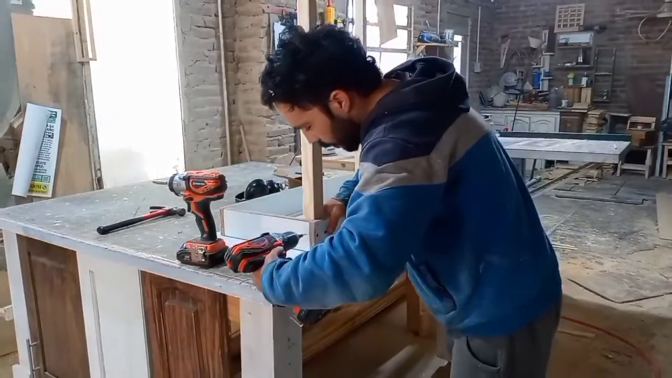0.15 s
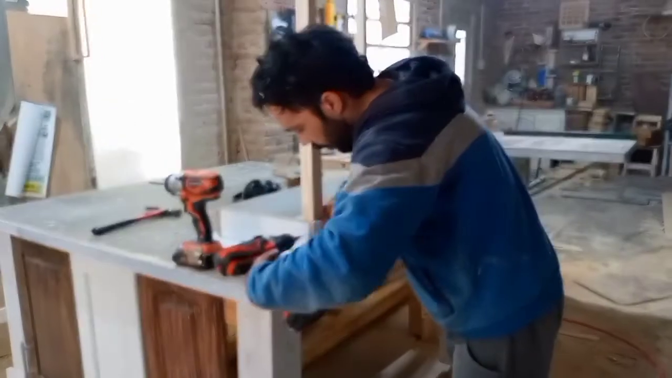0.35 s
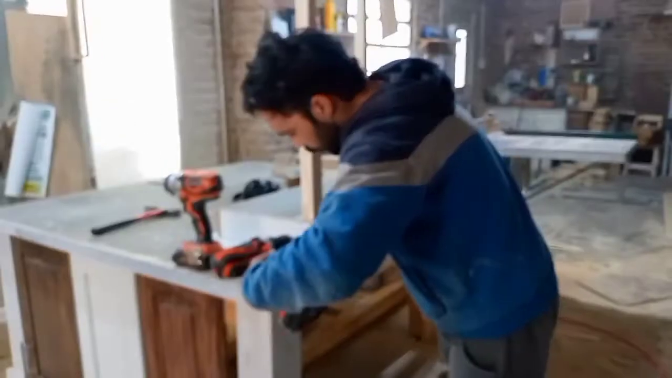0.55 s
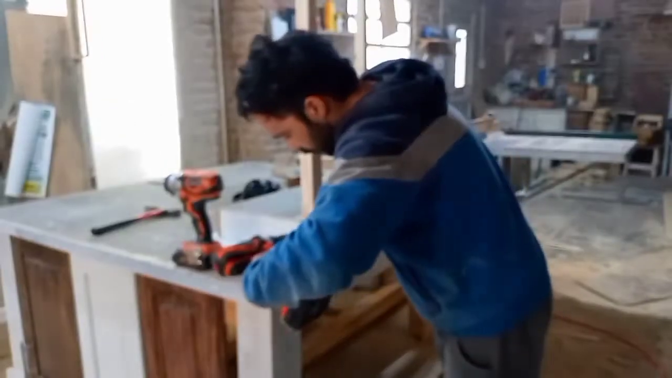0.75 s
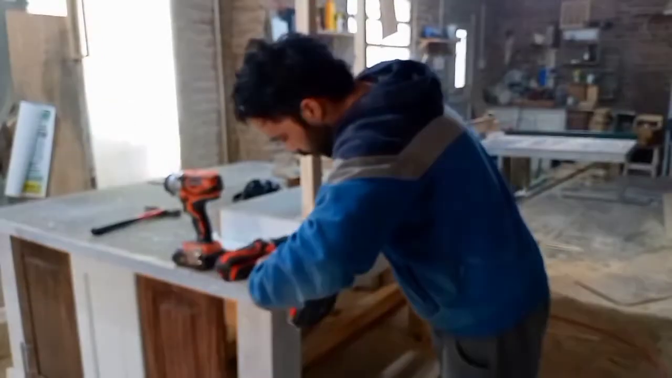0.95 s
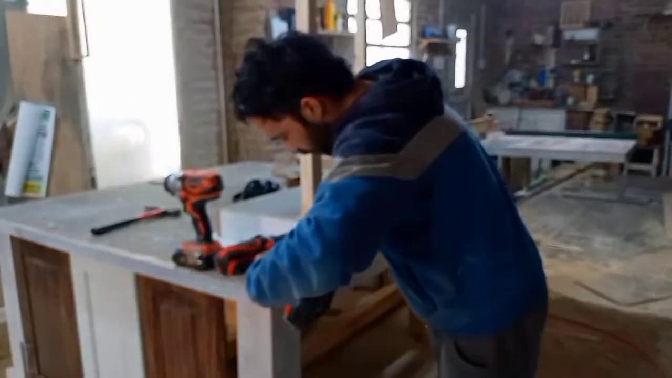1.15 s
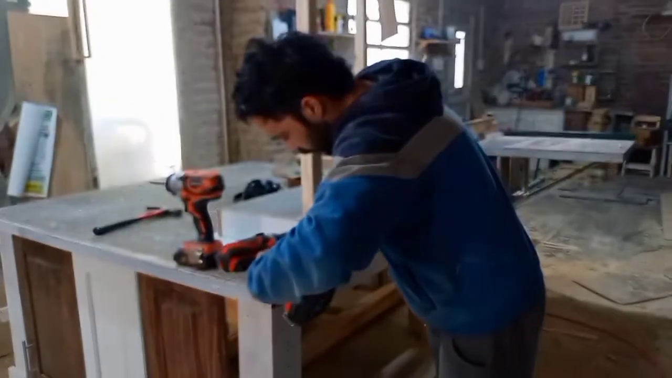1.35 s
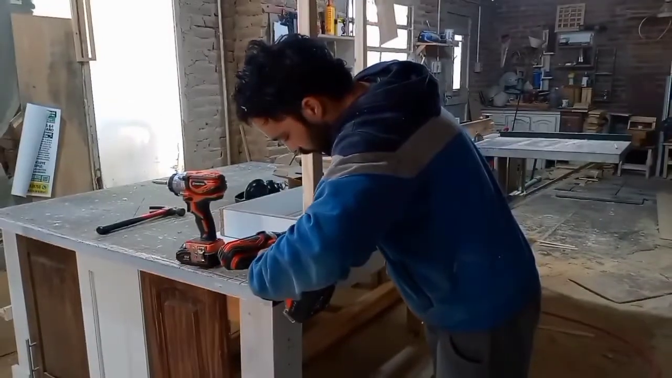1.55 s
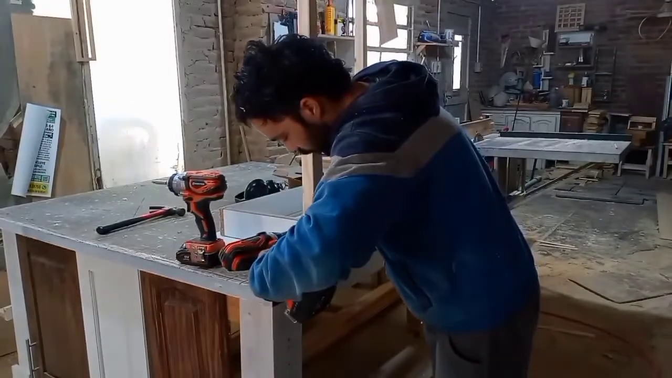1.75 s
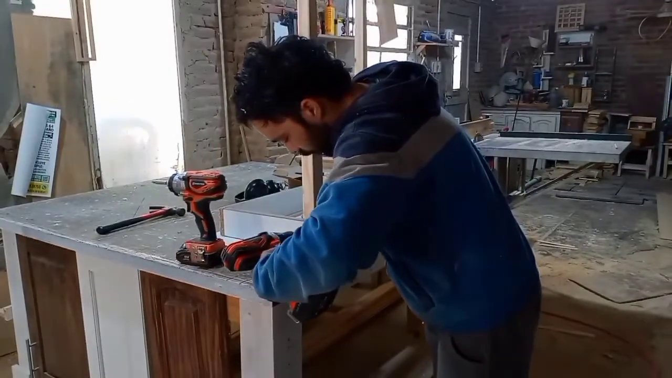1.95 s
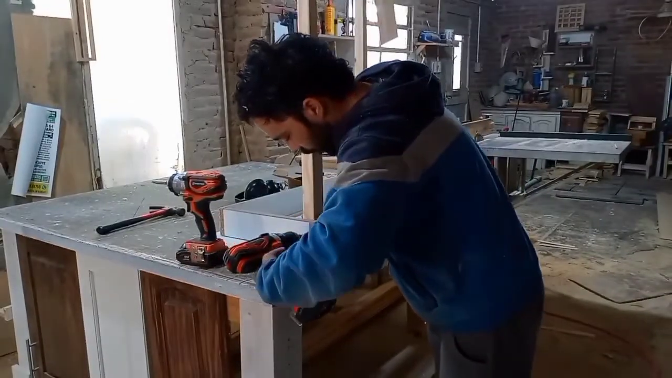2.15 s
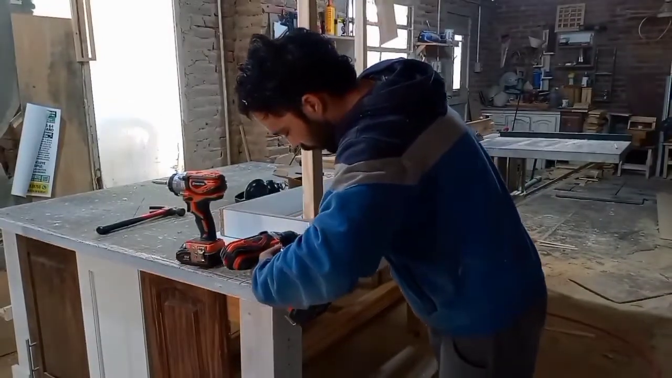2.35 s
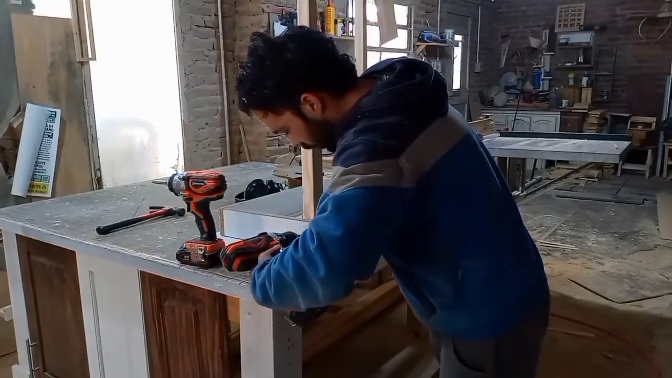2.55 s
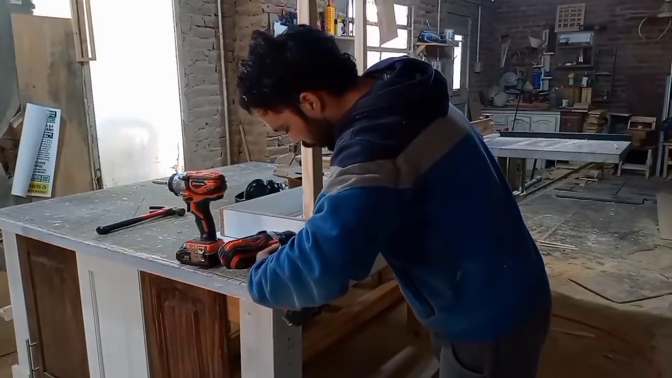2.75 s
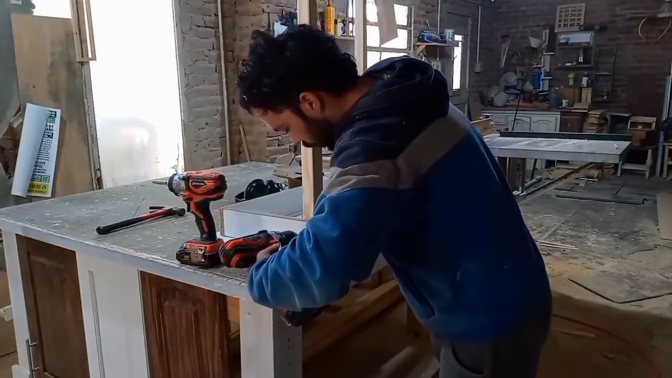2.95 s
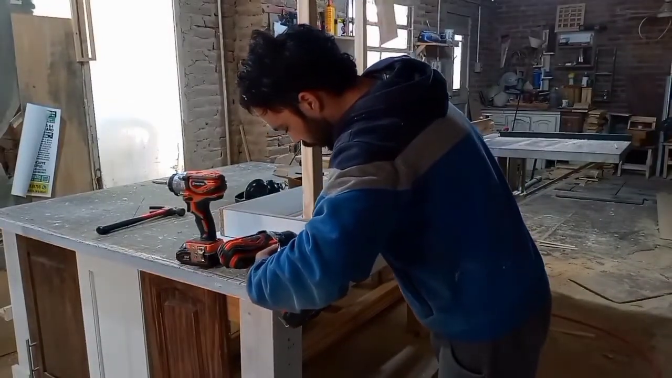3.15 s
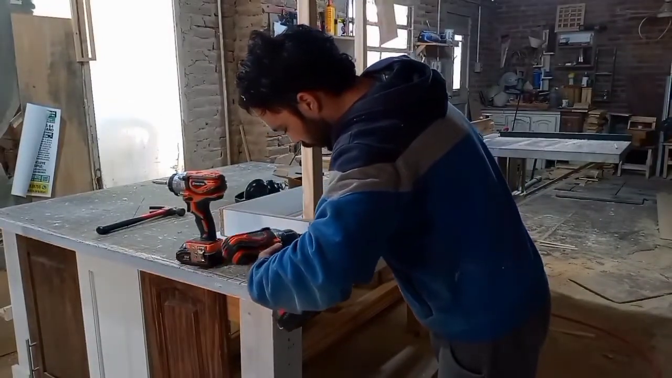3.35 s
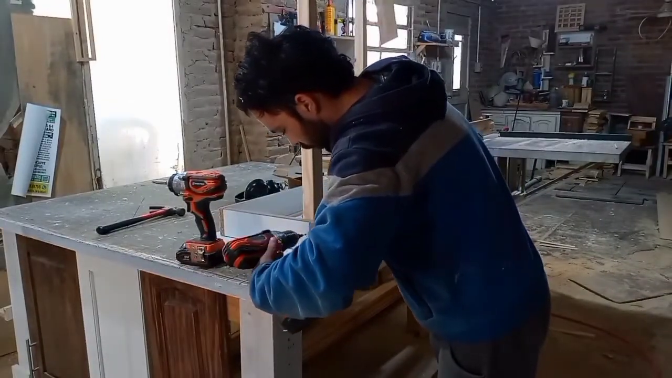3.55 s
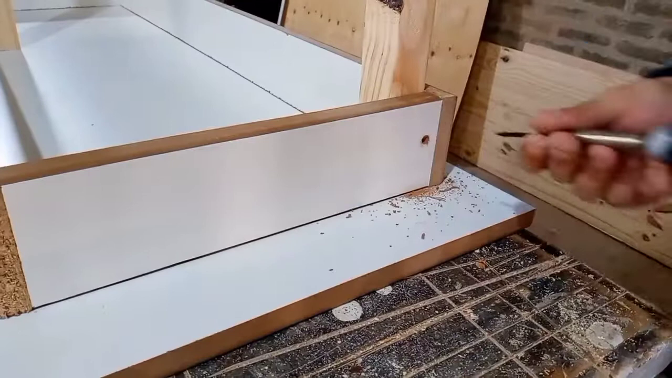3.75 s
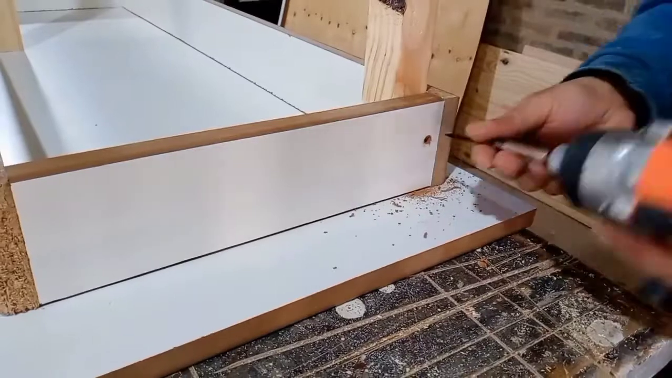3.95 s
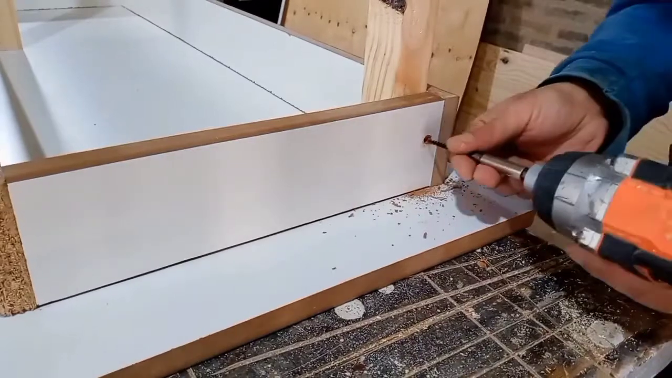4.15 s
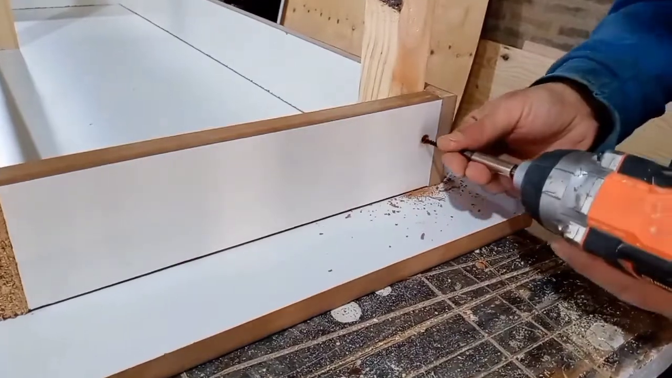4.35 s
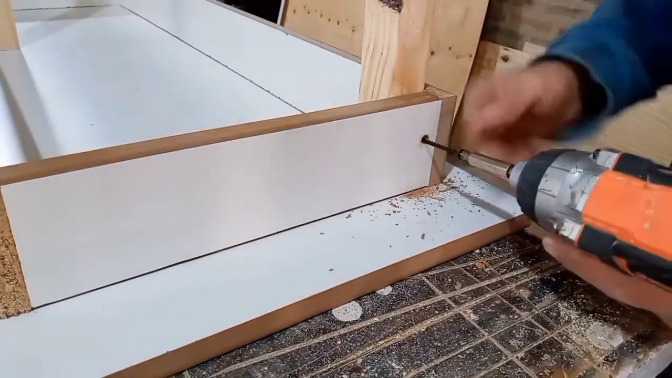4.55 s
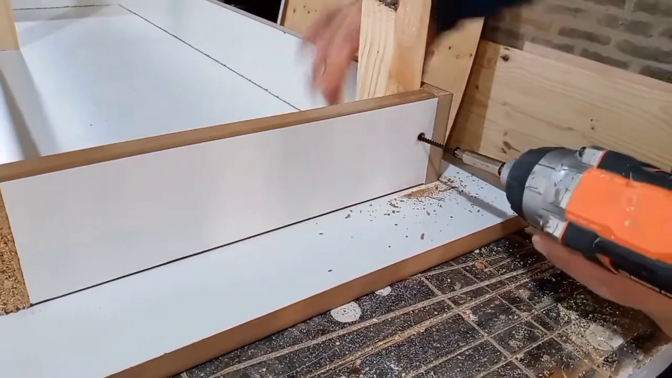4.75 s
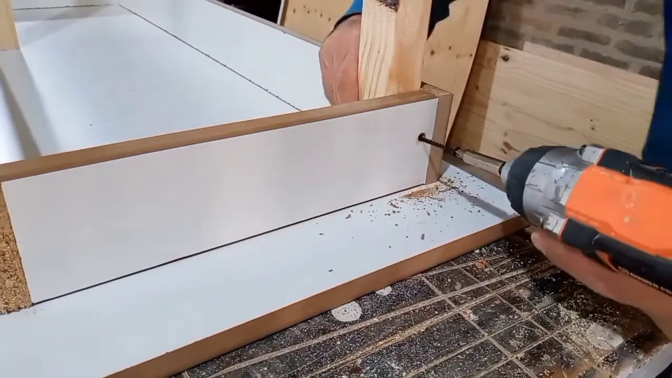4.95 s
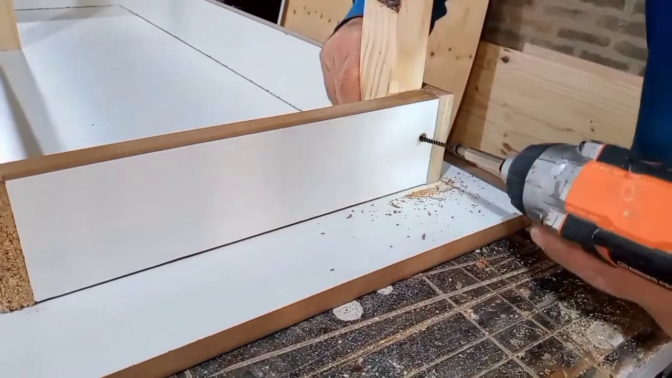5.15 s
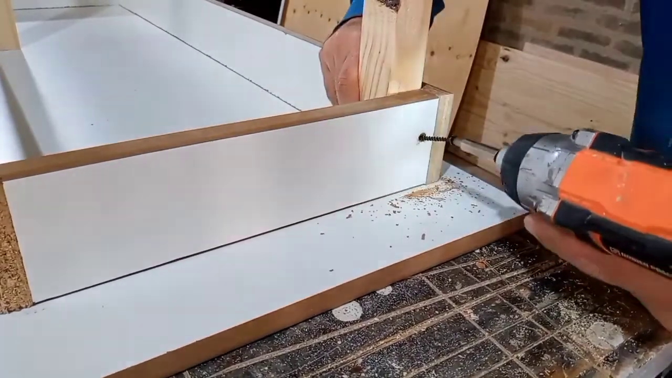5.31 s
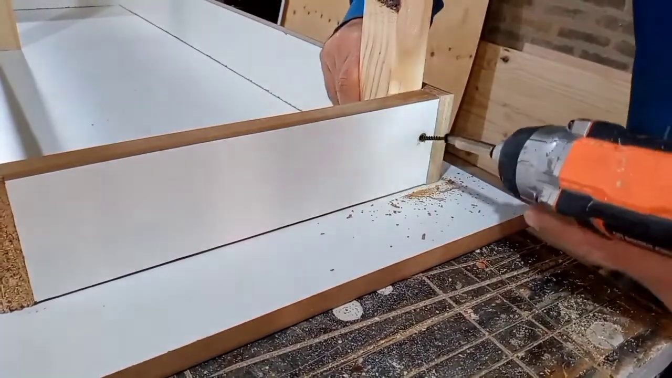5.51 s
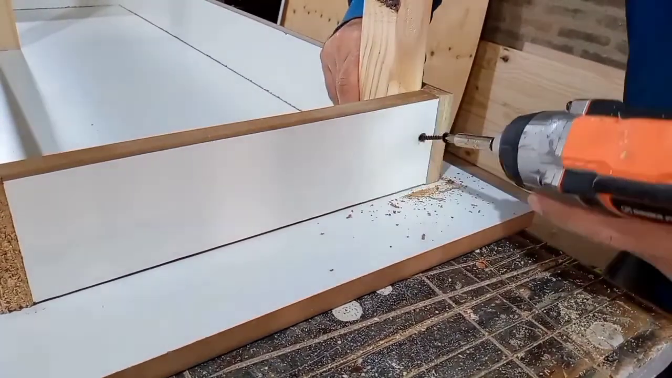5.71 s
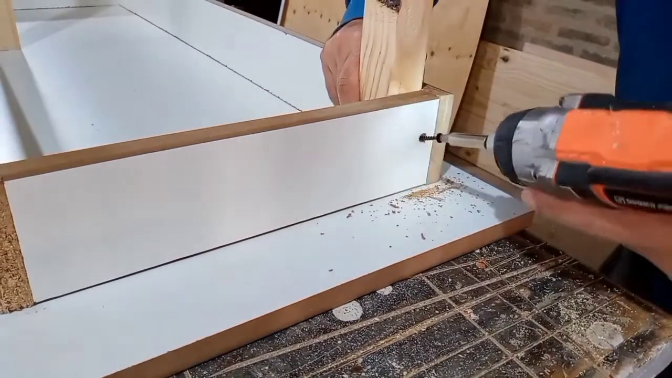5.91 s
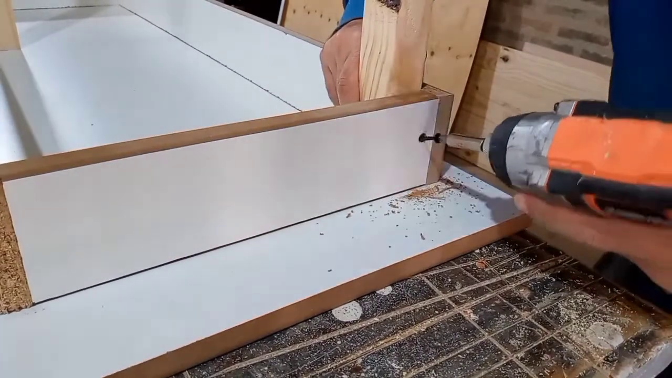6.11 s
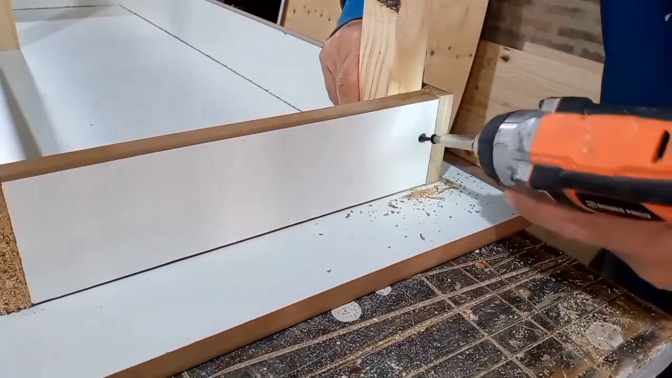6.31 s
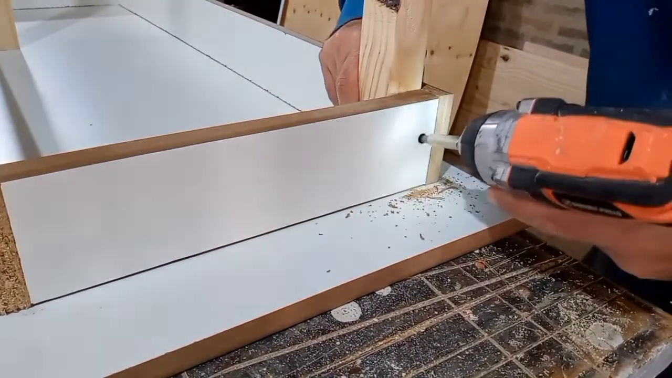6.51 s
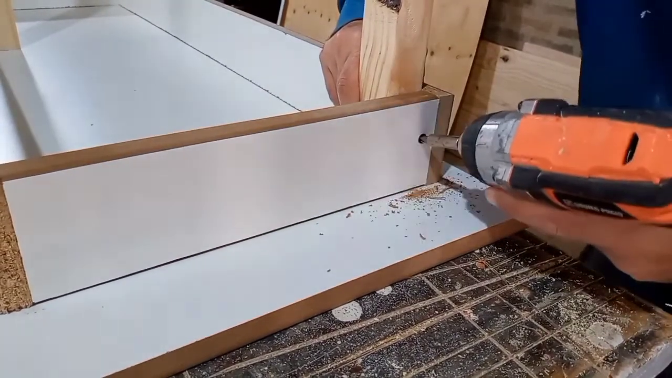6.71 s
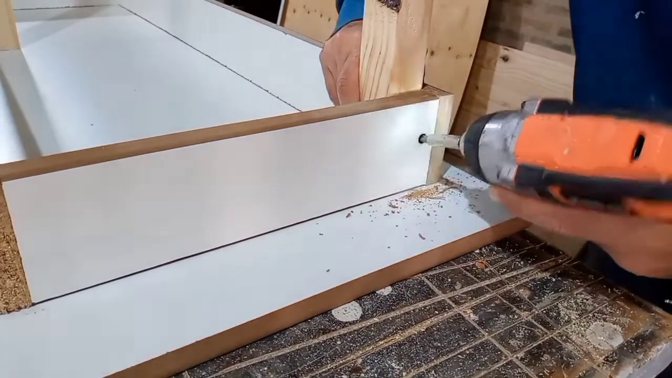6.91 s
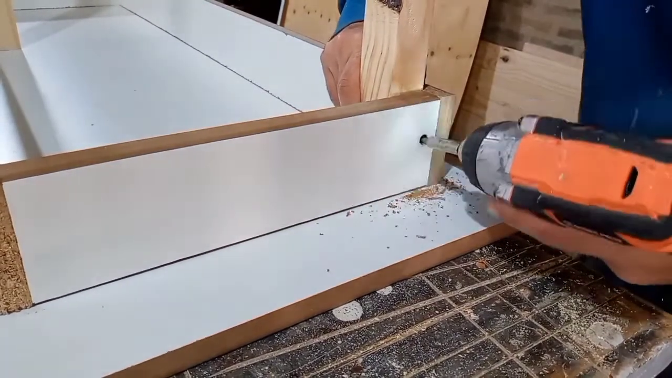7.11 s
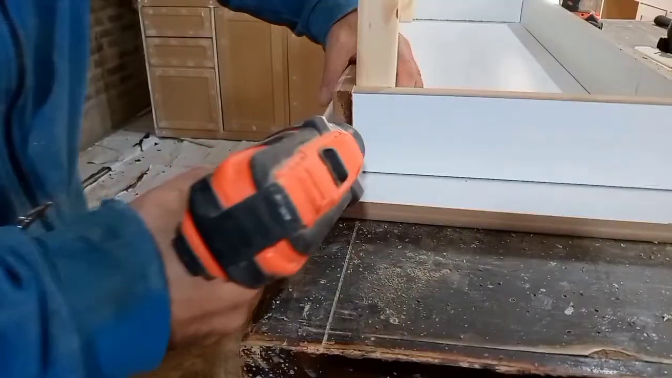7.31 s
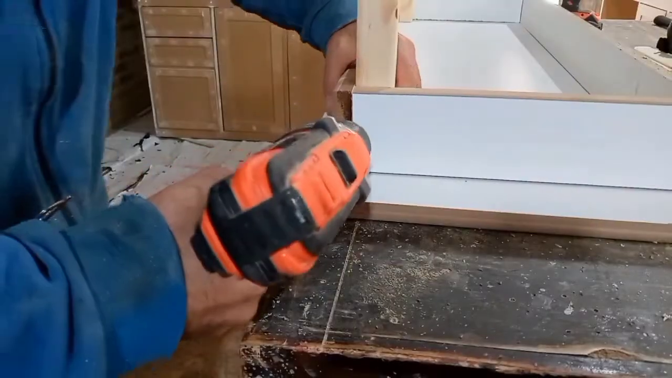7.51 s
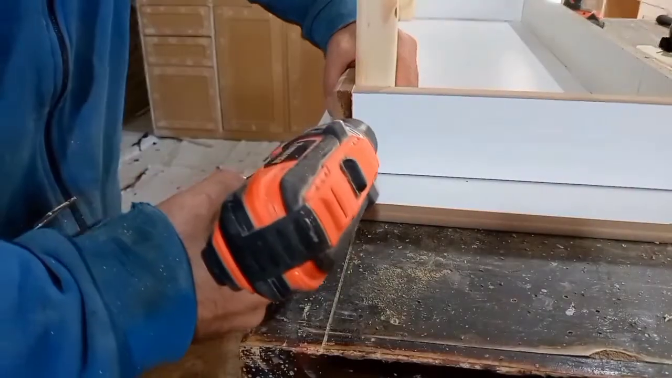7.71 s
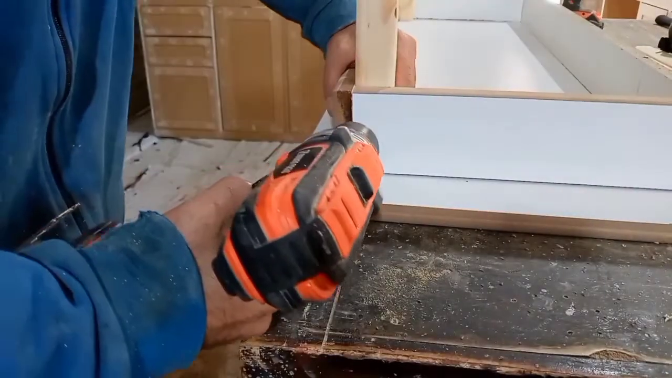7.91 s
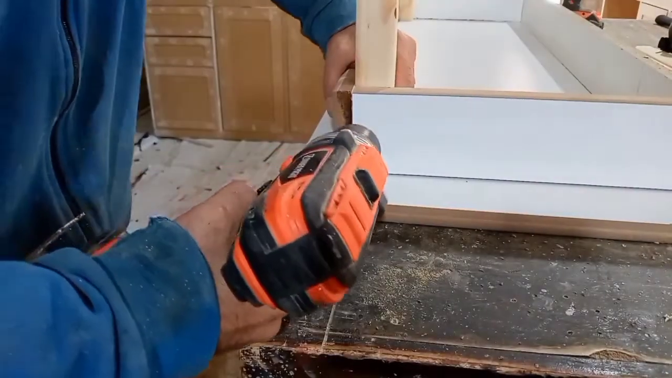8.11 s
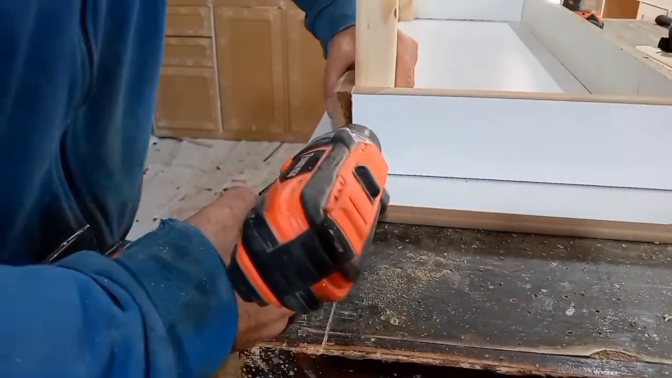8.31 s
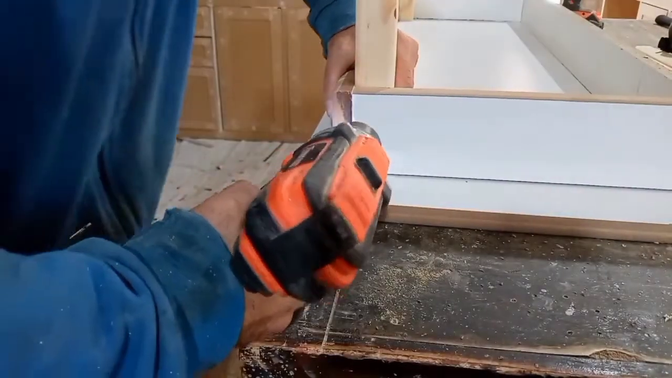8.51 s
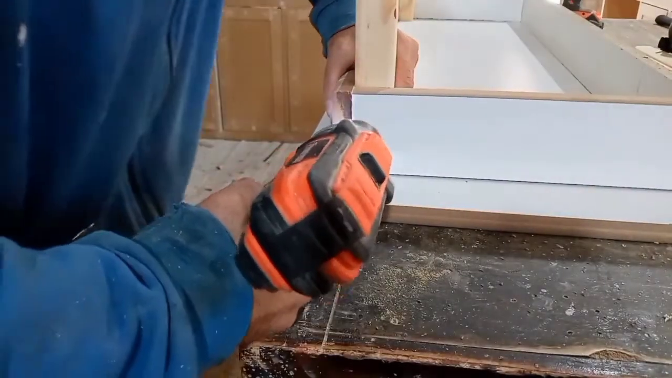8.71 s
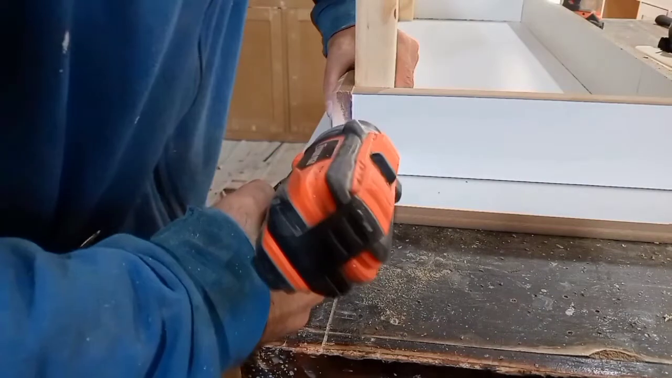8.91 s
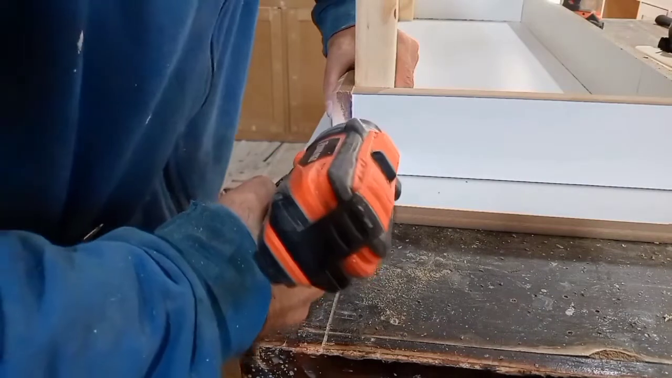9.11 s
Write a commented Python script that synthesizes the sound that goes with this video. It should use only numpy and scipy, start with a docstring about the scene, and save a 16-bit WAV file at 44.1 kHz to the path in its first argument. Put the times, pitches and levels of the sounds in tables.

```python
"""Drilling and driving a screw in a workshop

A cordless drill bores into a board in long runs and a driver turns a screw in with short bursts.
Gear teeth whine over a rough hiss that throbs once per motor turn, the board drums along and a
slipping bit squeals. Triggers click, tools knock on the bench and sleeves rustle in the pauses.
Both channels carry the same sound."""
import sys
import numpy as np
from scipy import signal
from scipy.fft import rfft, irfft, next_fast_len
from scipy.io import wavfile
from scipy.ndimage import uniform_filter1d

SR = 44100
rng = np.random.default_rng(int(sys.argv[2]) if len(sys.argv) > 2 else 0)


def wav_out(sig):
    """Save sig, one row per channel (or a flat mono array), as 16-bit PCM at SR to the path in sys.argv[1]."""
    wavfile.write(sys.argv[1], SR, np.round(np.clip(np.atleast_2d(sig).T, -1, 1) * 32767).astype(np.int16))


N = 408366
TOP_HZ = 15750


def undb(db):
    return 10 ** (np.asarray(db) / 20)


def walk(rate_hz, size):
    """Random levels held 1 / rate_hz s and slewed; spread near 1."""
    hold = int(SR / rate_hz)
    steps = np.repeat(rng.standard_normal(size // hold + 1), hold)
    return 1.2 * uniform_filter1d(steps, hold)[:size]


def colour(x, points, lo_hz=20., hi_hz=19900.):
    """Equalises x by (frequency [Hz], level [dB]) points between two soft edges; rms 1."""
    size = next_fast_len(len(x))
    hz = np.arange(1, size // 2 + 2) * SR / size
    point_hz, db = np.transpose(points)
    curve = undb(np.interp(np.log(hz), np.log(point_hz), db))
    edges = 1 / np.sqrt((1 + (lo_hz / hz) ** 8) * (1 + (hz / hi_hz) ** 8))
    shaped = irfft(rfft(x, size) * curve * edges, size)[:len(x)]
    return shaped / np.sqrt(np.mean(shaped ** 2))


def automation(rows):
    """First sample and per-sample curves of a breakpoint table."""
    times, *columns = np.transpose(rows)
    i = np.arange(int(times[0] * SR), min(int(times[-1] * SR), N))
    return i[0], [np.interp(i / SR, times, column) for column in columns]


def add(out, start, x):
    out[start:start + len(x)] += x[:len(out) - start]


# Room tone EQ: (frequency [Hz], relative level [dB])
ROOM_TONE_EQ = [(18, -51), (30, -28.5), (177, -18.5), (208, -9), (237, -16), (518, -16.5), (591, -20),
                (7800, -30.5), (9000, -38.5), (11500, -37.5), (13000, -31.5), (15500, -30)]


def room_tone(level_db=-76.5):
    """The workshop's faint, steady bed of low noise."""
    return undb(level_db) * colour(rng.standard_normal(N), ROOM_TONE_EQ)


def reflections(x, t60_s=.13, wet_db=-11):
    """The walls return a short, dark tail."""
    t = np.arange(SR // 2) / SR
    tail = colour(rng.standard_normal(len(t)), [(150, -5), (1000, 1.5), (6000, -5), (15000, -12.5)])
    tail *= 1000 ** (-t / t60_s)
    tail *= np.clip(t / .002, 0, 1) / np.sqrt(np.sum(tail ** 2))
    return undb(wet_db) * signal.fftconvolve(x, tail)[:N]


# Bench resonances, for rustle and strike: (frequency [Hz], relative level [dB], T60 [s])
WOOD_MODES = [(129, -12, 0.33), (372, 2, 0.2), (560, -9.5, 0.24), (749.4, -1, 0.28), (1050, -10.5, 0.19),
              (1580, -14, 0.83), (2220, -9, 0.14), (2299, -8.5, 0.13)]
# Hands, sleeves and sliding tools, one list per move: (time [s], hiss [dB], rumble [dB])
RUSTLE_MOVES = [
    [(0.1, -87, -86), (0.22, -68, -68), (0.34, -95, -95)],
    [(3.5, -31, -68), (3.54, -54, -52), (3.64, -51.5, -60), (3.694, -54, -45.5), (3.725, -59, -55),
     (3.74, -45.5, -59), (3.89, -53.5, -75), (3.96, -66, -87), (4.05, -83, -87)],
    [(4.05, -77, -89), (4.42, -70, -72), (4.48, -62, -65), (4.6, -59, -66.5), (4.69, -74.5, -80),
     (4.725, -63, -79.5), (4.8, -73, -82), (4.99, -84, -88)],
    [(7.09, -60, -54), (7.136, -54.5, -50.5), (7.334, -68, -68.5), (7.476, -80, -87), (7.556, -81, -67),
     (7.8, -90, -100)],
    [(7.95, -85, -77.5), (8.22, -76, -71), (8.245, -62, -75), (8.29, -63, -80)],
]


def rustle():
    """Cloth and tools drag over the bench: grainy hiss, and a rumble in the modes of the wood."""
    out = np.zeros(N)
    cloth_eq = [(1500, 1.5), (4000, 2), (7800, 2.5), (9500, -6.5), (15000, -6)]
    wood_eq = sorted((hz * ratio, db / 2 + skirt_db) for hz, db, _ in WOOD_MODES
                     for ratio, skirt_db in ((.92, -7), (1, 0), (1.08, -7)))
    for move in RUSTLE_MOVES:
        start, (hiss_db, rumble_db) = automation(move)
        grains = undb(1.6 * walk(260, len(hiss_db))) * rng.standard_normal((2, len(hiss_db)))
        hiss = colour(grains[0], cloth_eq, 1500)
        rumble = colour(grains[1], wood_eq, 270, 2200)
        add(out, start, undb(hiss_db) * hiss + undb(rumble_db) * rumble)
    return out


def strike(out, time_s, level_db, ring_hz, thud_hz, thud_db, t60_s):
    """Adds one hit: a soft swell, a wide crack, the tool's ring and a thud in the wood."""
    t = np.arange(SR // 4) / SR
    fade = lambda t60: 1000 ** (-t / t60)
    crack_noise, ring_noise, scatter, thump_noise, swell_noise = rng.standard_normal((5, len(t)))
    # hard blows crack brighter, light taps ring more
    crack = colour(crack_noise, DRIVER_EQ, 640, 40000 * undb(.27 * level_db))
    crack *= .57 * fade(.016) + .17 * fade(t60_s)
    ring = colour(ring_noise, [(ring_hz / 1.2, -25), (ring_hz, 0), (ring_hz * 1.2, -25)])
    ring *= undb(-18.5 - .2785 * level_db) * fade(t60_s)
    modes = np.zeros(len(t))
    for (hz, db, mode_t60), gain, detune in zip([*WOOD_MODES, (thud_hz, -2, .08)], scatter, scatter[50:]):
        mode_db = db + 4 * gain - 9 * abs(np.log2(hz / thud_hz))  # favours the struck spot's pitch
        tone = np.sin(2 * np.pi * hz * (1 + .04 * detune) * t)
        modes += undb(mode_db) * tone * fade(min(mode_t60, 2.2 * t60_s))
    thump_eq = [(thud_hz / 10, -50), (thud_hz / 2.5, -20), (thud_hz, 0), (thud_hz * 2.5, -12)]
    thump = .6 * colour(thump_noise, thump_eq) * fade(t60_s)
    thud = undb(thud_db + 3) * (modes / np.abs(modes).max() + thump)
    attack = 1 - np.exp(-t / .0008)
    start, lead = int(time_s * SR), int(.03 * SR)
    add(out, start, undb(level_db) * (crack + ring + thud) * attack)
    swell = colour(swell_noise[:lead], DRIVER_EQ, 800) * fade(.051)[lead - 1::-1]
    add(out, start - lead, undb(level_db - 21) * swell)


# Trigger pulls: (time [s], click [dB], jolt lag [s], jolt [dB], ring [Hz])
TRIGGER_PULLS = [(4.913, -51, 0.02, -34, 2650), (5.598, -38, 0.024, -18, 4500),
                 (6.081, -23, 0.026, -10, 2190), (6.727, -21.5, .026, -2, 7190),
                 (8.296, -25.5, 0.023, -22, 4830)]


def triggers():
    """The switch clicks, then the gears jolt."""
    out = np.zeros(N)
    for time_s, click_db, _, _, ring_hz in TRIGGER_PULLS:
        strike(out, time_s, click_db, ring_hz, thud_hz=1100, thud_db=-15, t60_s=.035)
    for time_s, _, lag_s, jolt_db, ring_hz in TRIGGER_PULLS:
        strike(out, time_s + lag_s, jolt_db, ring_hz, thud_hz=1560, thud_db=-16, t60_s=.035)
    return out


# Hits, mostly knocks of tools and a few trigger clicks: (time [s], level [dB], ring [Hz], thud [Hz], relative
# thud level [dB])
HITS = [(0.07, -69, 2970, 452, 4), (0.178, -54, 3130, 710, -3), (0.367, -29.5, 4000, 690, -35),
        (1.588, -11, 3170, 1585, -11.5), (1.629, -11, 3450, 746, -12), (2.123, -46, 5520, 1670, -11),
        (3.217, -16, 8300, 678, -14.5), (3.472, -12.5, 6350, 900, -35),
        (3.478, -16, 3580, 1820, -16.5), (3.733, -47.5, 5000, 685, 0), (3.878, -44, 7200, 458, -31),
        (4.13, -64, 7500, 900, -13), (4.229, -48, 5400, 824, -6), (4.378, -53, 7800, 1560, -4),
        (4.438, -48, 2150, 1430, 3), (5.004, -20, 4720, 1100, -11), (5.636, -17.5, 6000, 1586, -11),
        (5.753, -8.5, 7000, 1830, -18.5), (5.817, -5, 7800, 1000, -19), (5.837, -21, 7280, 1617, -12),
        (5.861, -14, 2860, 393, -11), (6.062, -43.5, 3500, 1000, -30), (6.454, -5, 3040, 754, -18.5),
        (6.479, -5, 2093, 940, -15.5), (6.709, -34, 7180, 966, -13.5), (6.777, -12, 7590, 1590, -14.5),
        (7.382, -40.5, 1994, 750, -5), (7.41, -55.5, 7600, 810, 0), (7.542, -58, 2300, 320, 1.5),
        (7.6, -78.5, 2300, 140, 12), (7.62, -80, 2300, 140, 13), (8.015, -57.5, 4540, 1050, -3),
        (8.105, -34, 7500, 660, -3.5), (8.235, -36.5, 7290, 1160, -15.5)]


def knocks():
    """Tool, bit and bench knock together; a few of the hits are trigger clicks."""
    out = np.zeros(N)
    for hit in HITS:
        strike(out, *hit, t60_s=.068)
    return out


# Slips of the bit: (time [s], first pitch [Hz], settled pitch [Hz], level [dB], overtone trim [dB],
# hold [s], sag during the hold [dB/s], fall after it [dB/s])
BIT_SLIPS = [(3.165, 8100, 8180, -24, 0, 0.042, 148, 298),
             (5.215, 6500, 6300, -28.5, -16.5, .005, 98.5, 602),
             (5.26, 5600, 4620, -21, -4, .036, 20, 3000), (5.312, 3814, 2954, -21.5, 5, 0.074, 82, 171.5)]
# Squeal harmonics, fundamental first: (relative level [dB])
SQUEAL_HARMONICS = [0.5, 0, -5, -10, -10]


def squeal(glide_s=.012, rise_db_per_s=800):
    """Steel sticks and slips on steel: a rough, fluttering stack that glides onto its pitch."""
    out, t = np.zeros(N), np.arange(-SR // 30, SR // 3) / SR
    sliding = np.exp(-np.maximum(t, 0) / glide_s)
    for time_s, first_hz, settled_hz, level_db, overtones_db, hold_s, sag, fall in BIT_SLIPS:
        hz = settled_hz + (first_hz - settled_hz) * sliding
        db = level_db + rise_db_per_s * np.minimum(t, 0)
        db -= sag * np.clip(t, 0, hold_s) + fall * np.maximum(t - hold_s, 0)
        # weaker and purer while the pitch still slides
        db -= 8 * np.sqrt(sliding)
        bright_db = overtones_db - 7 * np.sqrt(sliding)
        wobble = 1 + .028 * walk(1300, len(t)) + .01 * walk(300, len(t))
        phase = 2 * np.pi * np.cumsum(hz * wobble) / SR
        stack = np.zeros(len(t))
        for k, harmonic_db in enumerate(SQUEAL_HARMONICS, 1):
            tilt_db = .21 * (k - 1) * np.minimum(db + 24, 0)  # overtones die first as the slip weakens
            gain = undb(harmonic_db + bright_db * (k > 1) + tilt_db)
            stack += gain * np.sin(k * phase) * (k * hz < TOP_HZ)
        flutter_db = 3.5 * walk(700, len(t)) + 2.5 * walk(150, len(t))
        add(out, int((time_s + t[0]) * SR), np.sqrt(2) * undb(db + flutter_db) * stack)
    return out


def gear_hiss(hz, eq, bands, throb, grit_db, flicker_db):
    """Noise throbbing at hz, roughened by chips; bands (low [Hz], high [Hz], level [dB]) flicker apart."""
    n = len(hz)
    phase = 2 * np.pi * np.cumsum(hz) / SR
    rough = (1 + throb * np.cos(phase)) * undb(grit_db * walk(500, n))
    return sum(undb(db + flicker_db * walk(30, n)) * colour(rough * rng.standard_normal(n), eq, lo, hi)
               for lo, hi, db in bands)


def whine(hz, wobble, flutter_db):
    """One tone, rms near 1, that wanders in pitch and flutters in strength."""
    phase = 2 * np.pi * np.cumsum(hz * (1 + wobble * walk(600, len(hz)))) / SR
    return np.sqrt(2) * undb(flutter_db * walk(60, len(hz))) * np.sin(phase)


def motor_run(rows, fall_db_per_s, rise_db_per_s=1300, depth_db=45, dull_lead_s=.071, dull_s=.095):
    """Fades a run in and out; returns first sample, time, how far the sound has dulled as the run ends (0-1),
    curves."""
    first, last = list(rows[0]), list(rows[-1])
    first[0] -= depth_db / rise_db_per_s
    last[0] += depth_db / fall_db_per_s
    first[2] -= depth_db
    last[2] -= depth_db
    start, curves = automation([first, *rows, last])
    t = (start + np.arange(len(curves[0]))) / SR
    stop_s = rows[-1][0]
    stops = stop_s < N / SR - dull_lead_s  # a run that lasts to the end stays bright
    dull = stops * (1 - np.exp(-np.maximum(t - stop_s + dull_lead_s, 0) / dull_s))
    return start, t, dull, curves


# Driving, one list per burst: (time [s], gear mesh [Hz], growl [dB], relative board drum [dB])
DRIVER_BURSTS = [
    [(5.008, 1086, -30, -19), (5.1, 1165, -26, -15), (5.25, 1155, -26, -10.5), (5.3, 1162, -30.5, -11),
     (5.345, 1122, -33, -26), (5.44, 1164, -32.5, -19.5)],
    [(5.625, 1648, -34, -8.5), (5.69, 1810, -19.5, -10), (5.73, 1727, -22.5, -4),
     (5.748, 1770, -30.5, -1.5), (5.77, 1706, -23.5, 2.5), (5.84, 1664, -31.5, -0.5),
     (5.89, 1580, -26.5, -5)],
    [(6.092, 1505, -25.5, 1), (6.14, 1693, -27.5, -1), (6.17, 1840, -20.5, -14.5), (6.3, 1684, -22.5, -15),
     (6.42, 1562, -20, -12), (6.442, 1553, -26.5, -5.5), (6.47, 1553, -19.5, -5), (6.58, 1543, -21.5, -12)],
    [(6.76, 1545, -29, 0), (6.785, 1538, -17, -4.5), (6.9, 1540, -15, -7), (7.01, 1563, -18.5, -5.5),
     (7.035, 1562, -22, -8), (7.082, 1570, -21.5, -9.5)],
]
# Trims on the growl and release, per burst: (grinding [dB], fan air [dB], mesh whine [dB], fall [dB/s])
BURST_MIX = [(4, -6, -10, 228), (5, 1.5, -3, 185), (2.5, -2.5, -1, 186.5), (1.5, -4, -7, 1100)]
# EQ of the growl, also of each strike's crack and swell: (frequency [Hz], relative level [dB])
DRIVER_EQ = [(35, -70), (60, -35.5), (343, -5), (423, -8.5), (756, -4.5), (849, -9.5), (976, -2.5),
             (2530, -3.5), (7720, 0), (9970, -15), (15500, -16)]
# Gear whine: (pitch [x mesh], wobble [share of pitch], relative level [dB])
DRIVER_PARTIALS = [(.6, .04, -16), (1, .03, -12), (1.25, .02, -13), (2, .035, -11), (3, .04, -20),
                   (5, .04, -18)]
# Rattling modes of frame and bit: (frequency [Hz], width [Hz], relative level [dB])
FRAME_MODES = [(728, 79, -2.5), (940, 79, 0.5), (1637, 230, 4.5), (3146, 37, -1.5), (4740, 170, -0.5),
               (8070, 830, -5.5)]


def driver():
    """A loaded gear train growls and grinds while the screw rattles the frame."""
    out = np.zeros(N)
    for burst, (grind_db, air_db, mesh_db, fall) in zip(DRIVER_BURSTS, BURST_MIX):
        start, _, dull, (hz, growl_db, board_db) = motor_run(burst, fall)
        grind_db = grind_db - 13 * dull  # at the stop the treble sinks and the low end swells
        bands = [(1220, 4400, -5), (20, 1080, board_db + 9.5 * dull - 5.5),
                 (4000, 11300, grind_db - 7), (8700, 32000, air_db - 23 * dull)]
        growl = gear_hiss(hz, DRIVER_EQ, bands, throb=.1, grit_db=2.7, flicker_db=.8)
        treble_db = lambda f: grind_db * (f > 4200)  # high tones ride with the grinding
        teeth = sum(undb(db + mesh_db + treble_db(k * hz)) * whine(k * hz, wobble, flutter_db=3.5)
                    for k, wobble, db in DRIVER_PARTIALS)
        rattle = sum(undb(db - 17.5 + treble_db(f)) * whine(np.full(len(hz), f), width / f, flutter_db=4)
                     for f, width, db in FRAME_MODES)
        add(out, start, undb(growl_db) * (growl + teeth + rattle))
    return out


# The drill leans on the board: (start [s], end [s], relative hum level [dB])
HUM_SPANS = [(1.432, 1.513, -18.5), (8.99, 9.3, -24.5)]


def board_hum(t, turn_hz, idle_db=-40, edge_db_per_s=122.5):
    """The board hums at the motor's turn rate, louder when the drill bears on it."""
    hum_db = np.full(len(t), idle_db)
    for start_s, end_s, db in HUM_SPANS:
        outside_s = np.abs(t - np.clip(t, start_s, end_s))
        hum_db = np.maximum(hum_db, db - edge_db_per_s * outside_s)
    return undb(hum_db) * whine(turn_hz, .003, flutter_db=1)


# Boring, one list per run: (time [s], motor turns [Hz], level [dB], relative commutator whine [dB])
DRILL_RUNS = [
    [(0.372, 102, -42, -32), (0.42, 120.3, -38, -25), (0.47, 168.4, -35.5, -24), (0.53, 257, -32, -16),
     (0.61, 270, -31.5, -8), (0.7, 273.5, -31.5, -14), (1.4, 271.4, -31, -19.5), (1.56, 268.6, -29.5, -8),
     (1.62, 257.2, -21.5, -23), (1.7, 242.5, -27, -17), (1.8, 240.4, -29.5, -14),
     (1.915, 243.7, -27.5, -10)],
    [(2.125, 117.3, -43.5, -30), (2.176, 185, -31, -16), (2.228, 226, -31, -4.5), (2.27, 241.5, -30, -9),
     (2.4, 244.5, -30, -7.5), (2.75, 251.8, -30.5, -9), (3.0, 253.8, -30.5, -10), (3.13, 255.8, -31, -22.5),
     (3.215, 248, -26, -25)],
    [(8.3, 120, -42.5, -24), (8.352, 181.6, -26.5, -15), (8.42, 258.7, -23.5, -20), (8.5, 271, -22, -14),
     (8.7, 276.2, -21.5, -12), (8.94, 271, -21.5, -16), (9.1, 265, -21, -19), (9.26, 262.3, -20, -8.5)],
]
# Trims on each run's level: (board drum [dB], fan air [dB], mesh whine [dB])
RUN_MIX = [(-11.5, -6.5, -17), (-11, -7.5, -18.5), (-14.5, -6.5, -18.5)]
# EQ of the gear hiss: (frequency [Hz], relative level [dB])
DRILL_EQ = [(35, -73.5), (60, -45), (220, -23.5), (266, -17), (1200, -8), (1550, -1.5), (2530, -3.5),
            (3270, -0.5), (5080, -3.5), (6710, -7), (10200, -26.5), (15500, -22)]
# Further whine: (pitch [x turn rate], wobble [share of pitch], trim in run 1 [dB], 2 [dB], 3 [dB])
DRILL_PARTIALS = [(5.02, 0.0032, -19.5, -34, -25.5), (9.89, 0.0025, -18.5, -24, -32),
                  (11.24, .005, -26.5, -19, -41), (12.87, 0.0054, -23.5, -25, -15),
                  (15.15, 0.0038, -15, -33, -16.5), (16.46, 0.007, -20.5, -20, -25),
                  (23.96, 0.005, -17, -18, -29), (24.46, .04, -25.5, -27, -11.5),
                  (24.55, 0.0046, -17.5, -12.5, -12.5), (29.7, 0.04, -13.5, -12.5, -10.5)]


def drill(housing_hz=872.4, housing_width_hz=85.2):
    """Gear hiss, board and fan under the whine of commutator and gear teeth."""
    out = np.zeros(N)
    for run, (rows, (board_db, air_db, mesh_db)) in enumerate(zip(DRILL_RUNS, RUN_MIX)):
        start, t, dull, (hz, level_db, commutator_db) = motor_run(rows, fall_db_per_s=209.5)
        bands = [(1200, 26400, -4.5), (19.44, 1054, board_db + 6 * dull),
                 (7660, 16700, air_db - 10 * dull)]
        hiss = gear_hiss(hz, DRILL_EQ, bands, throb=.057, grit_db=.7, flicker_db=1.32)
        teeth = sum(undb(db[run]) * whine(k * hz, wobble, flutter_db=2.5)
                    for k, wobble, *db in DRILL_PARTIALS)
        teeth *= (hz / hz.max()) ** 4  # these sing only near full speed
        commutator = undb(commutator_db) * whine(12 * hz, .0026, flutter_db=4)
        mesh_hz = 5.85 * hz
        # the mesh whine swells as it sweeps through the housing's resonance
        housing_db = 8 * np.exp(-((mesh_hz - housing_hz) / housing_width_hz) ** 2)
        mesh = undb(mesh_db + housing_db) * whine(mesh_hz, .016, flutter_db=3)
        tones = undb(-10 * dull) * (teeth + commutator + mesh)
        add(out, start, undb(level_db) * (hiss + tones + board_hum(t, hz)))
    return out


def scene():
    """Mono mix on two channels; only hits and squeals feed the reverb."""
    accents = triggers() + knocks() + squeal()
    room = reflections(accents) + room_tone()
    return np.tile(room + accents + drill() + driver() + rustle(), (2, 1))


def record(dry, ceiling=.62):
    """Rounds the loudest peaks, rolls off the bass and cuts the top steeply."""
    rounded = dry / (1 + (dry / ceiling) ** 4) ** .25
    thin = signal.sosfilt(signal.butter(2, 70, "high", fs=SR, output="sos"), rounded)
    return signal.sosfilt(signal.ellip(10, .2, 85, TOP_HZ, fs=SR, output="sos"), thin)


dry = scene()
out = record(dry)
wav_out(out)
```